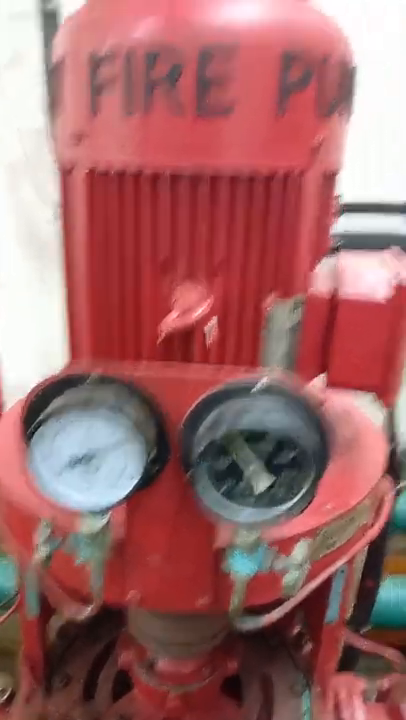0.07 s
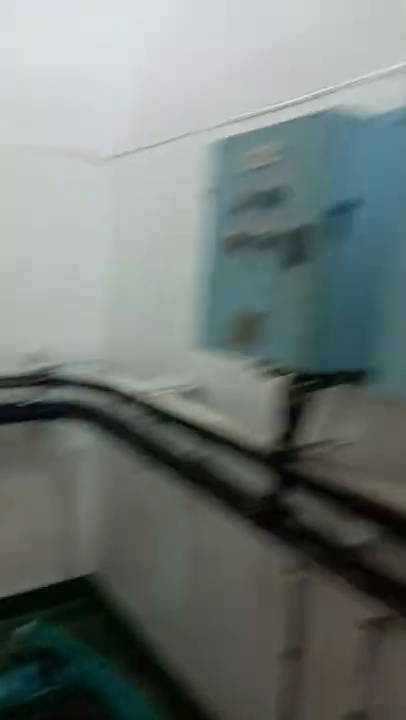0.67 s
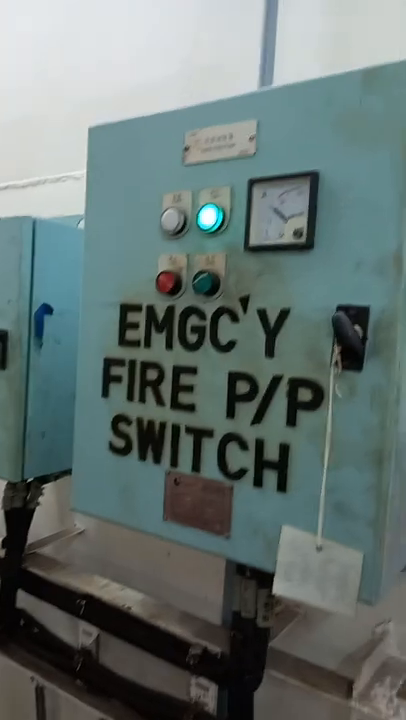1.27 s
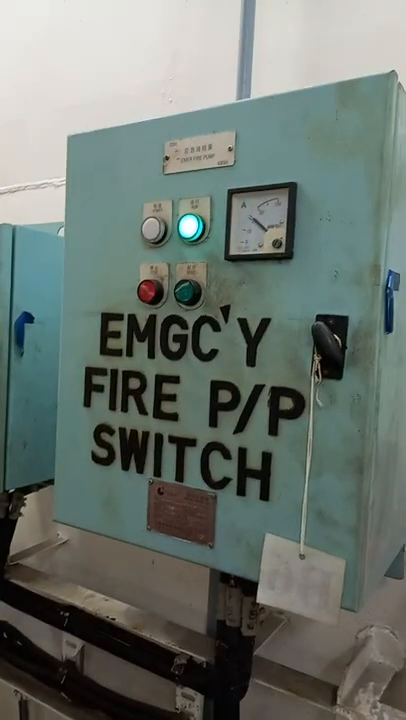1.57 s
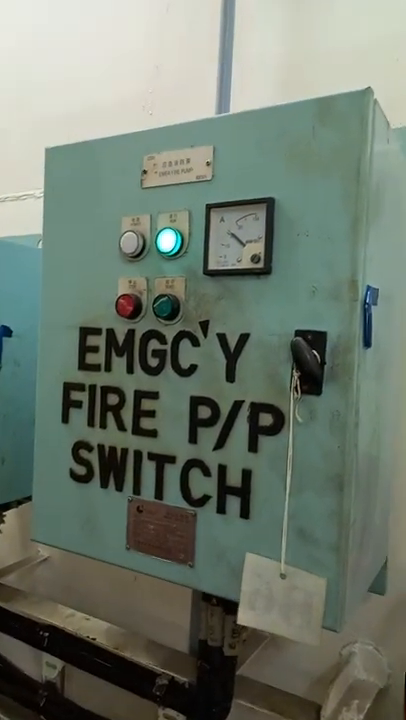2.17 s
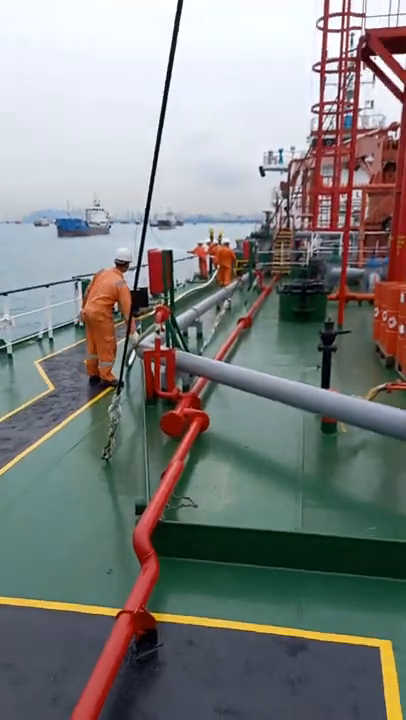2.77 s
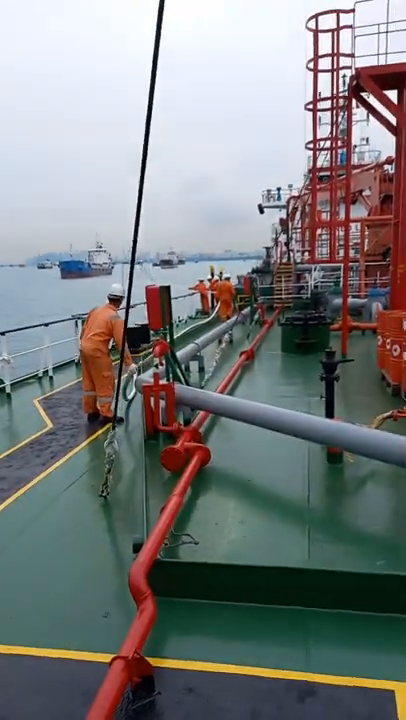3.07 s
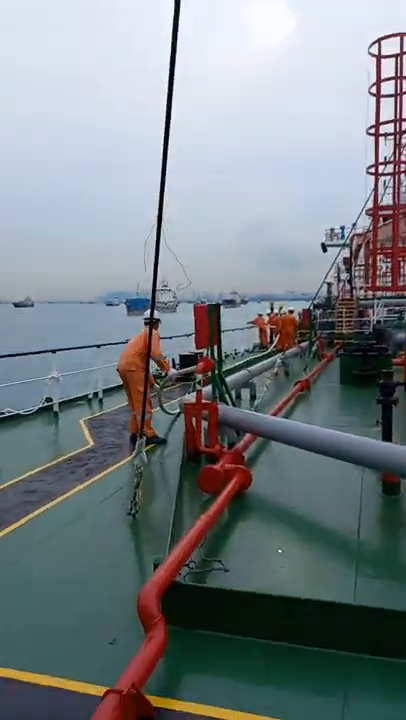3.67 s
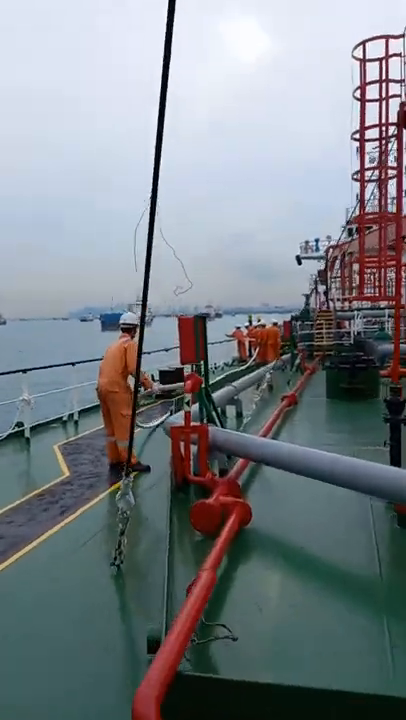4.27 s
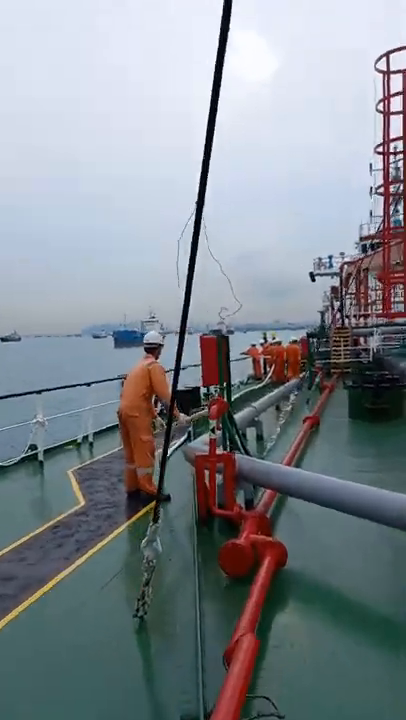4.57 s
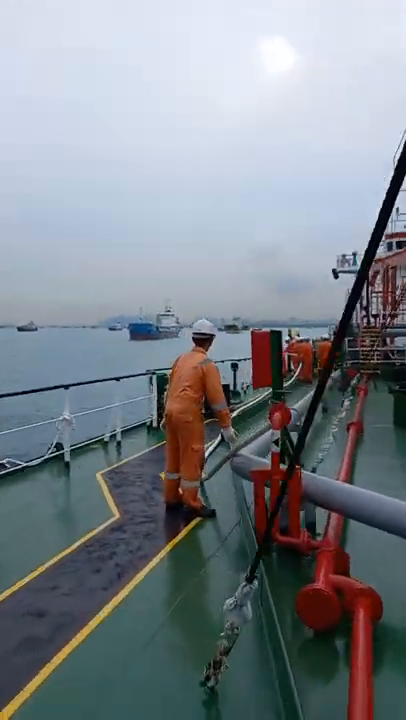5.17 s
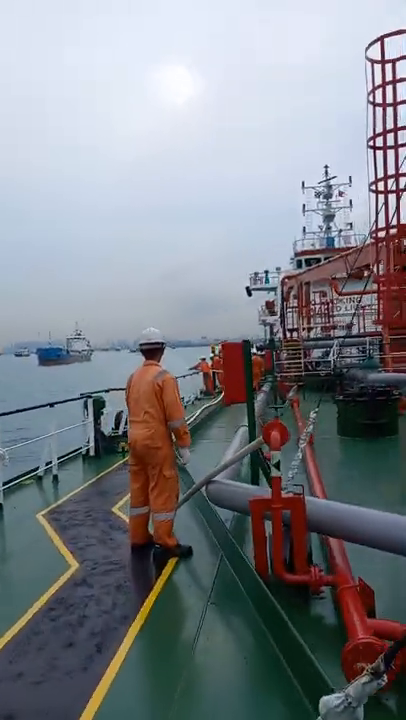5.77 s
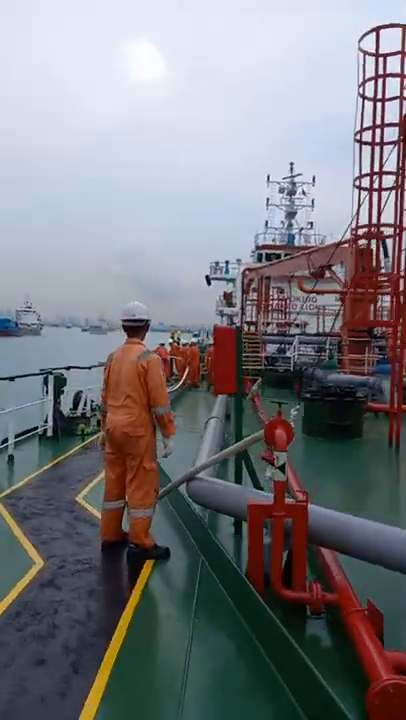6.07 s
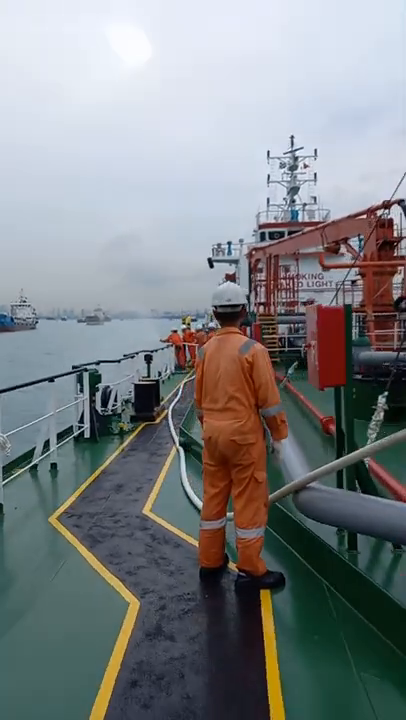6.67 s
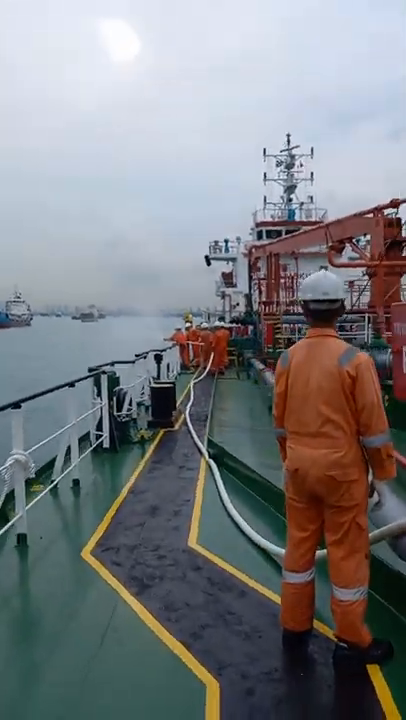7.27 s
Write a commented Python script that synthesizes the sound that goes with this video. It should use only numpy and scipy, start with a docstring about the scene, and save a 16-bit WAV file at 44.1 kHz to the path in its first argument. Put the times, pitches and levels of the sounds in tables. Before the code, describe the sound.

From the start, an electric pump runs loud and close in a ship's steel machinery room: a steady low hum with a whining motor and a rush of water and cooling air. The hum swells briefly around 1 second. At about 2.4 seconds the sound cuts abruptly to the quieter open deck. The pump is now muffled, its hum beating against a generator's low exhaust drone, with a soft roar of air ducts. A faint whine swells just after 3 seconds, and deck gear gives a dry click on the right at 3.4. Fainter ticks follow near 4.8, 5.3 and 6 seconds. From about 4 seconds the pump and ducts recede and wind rumbles on the microphone, thumping hardest between 5.5 and 6.6 seconds. The drones dip around 6.5, then return. A faint airy hiss swishes along until the end at about 7.6 seconds.

```python
"""An electric fire pump runs in a ship's steel machinery space: its shaft hums, its motor whines,
and rushing water and cooling air ring the casing. The scene then cuts to the open deck, where the
pump is muffled and falls behind, its hum beating against a generator's exhaust drone. Air ducts
roar softly, wind buffets the microphone, a faint hiss drifts by and deck gear ticks."""
import sys
import numpy as np
from scipy import signal
from scipy.fft import rfft, irfft, next_fast_len
from scipy.io import wavfile
from scipy.ndimage import uniform_filter1d

SR = 44100
rng = np.random.default_rng(int(sys.argv[2]) if len(sys.argv) > 2 else 0)


def generate_wav(sig):
    """Save sig (samples, or channels by samples) to the path in sys.argv[1] as 16-bit PCM at SR."""
    pcm = np.round(np.clip(np.atleast_2d(sig).T, -1, 1) * 32767).astype(np.int16)
    wavfile.write(sys.argv[1], SR, pcm)


N = 332073
TIME = np.arange(N) / SR
FREQS = np.maximum(np.fft.rfftfreq(N, 1 / SR), 1)

SHAFT_HZ, EXHAUST_HZ = 49.77, 75.42
DECK_S = 2.3502  # the cut from inside to the deck
OPEN_S, OPEN_LENGTH_S = 4.37, 0.61  # stepping out of the deckhouse's shelter

# how alike left and right are in the reverberant space: (frequency [Hz], correlation [0-1])
LIKENESS = [(60, .99), (130, 0.95), (290, 0.75), (640, 0.43), (1400, 0.11), (3000, 0)]


def undb(db):
    """Decibels to gain."""
    return 10 ** (np.asarray(db) / 20)


def pan(db):
    """Channel gains for left minus right in dB."""
    return undb(np.array([[db], [-db]]) / 2)


def bump(s, length):
    """A smooth rise and fall around a moment, 1 at its top."""
    return np.exp(-((TIME - s) / length) ** 2)


def ramp(s, length):
    """An even change from 0 to 1, centred on a moment."""
    return np.clip((TIME - s) / length + .5, 0, 1)


def swelling(steady_db, swells):
    """Gain of a steady bed plus swells (time [s], half-width [s], level [dB]), added in power."""
    swell_power = sum((undb(db) * bump(s, length)) ** 2 for s, length, db in swells)
    return np.sqrt(undb(steady_db) ** 2 + swell_power)


def drift(rate):
    """Random values held for 1 / rate seconds and smoothed twice; spread 1."""
    hold = int(SR / rate)
    held = np.repeat(rng.standard_normal(N // hold + 2), hold)
    smooth = uniform_filter1d(uniform_filter1d(held, hold), hold)[:N]
    return smooth / smooth.std()


def waver(depth_db, rate):
    """A gain that drifts up and down within bounds."""
    return undb(depth_db * np.tanh(drift(rate)))


def rotation(hz, wander):
    """Angle of a machine cycle whose speed wanders slightly."""
    return 2 * np.pi * np.cumsum(hz * (1 + wander * drift(5.94))) / SR


def colour(points):
    """A curve through (frequency [Hz], value) points, straight over log frequency."""
    hz, value = np.transpose(points)
    return np.interp(np.log(FREQS), np.log(hz), value)


def shape(x, db):
    """Equalise by a gain in dB at each frequency."""
    size = next_fast_len(N)
    gain = np.interp(np.fft.rfftfreq(size, 1 / SR), FREQS, undb(db))
    return irfft(rfft(x, size) * gain, size)[..., :N]


def treble_of(x):
    """The part of a sound above about 4 kHz."""
    return shape(x, -20 * np.log10(1 + (4000 / np.maximum(FREQS, 400)) ** 8))


def normalise(x, band_hz):
    """Scale a stereo sound so that its centre has unit RMS within a band."""
    sos = signal.butter(2, band_hz, "bandpass", fs=SR, output="sos")
    return x / np.std(signal.sosfilt(sos, x.mean(axis=0)))


def stereo_noise(likeness):
    """White noise whose two channels are correlated by the likeness."""
    likeness = np.broadcast_to(np.clip(likeness, 0, .999), FREQS.shape)
    mid = shape(rng.standard_normal(N), 10 * np.log10(1 + likeness))
    side = shape(rng.standard_normal(N), 10 * np.log10(1 - likeness))
    return np.array([mid + side, mid - side])


def flicker(x, rate, depth_db, bands):
    """Overlapping bands, closer in the bass, each swell and sink on their own."""
    place = np.sqrt(FREQS / FREQS[-1]) * (bands - 1)
    shares = (np.maximum(1 - abs(place - band), 1e-6) for band in range(bands))
    return sum(shape(x, 20 * np.log10(share)) * undb(depth_db * drift(rate)) for share in shares)


def distance_db(leaves_s=4.044, door_m=0.64, speed_m_s=1.46):
    """Spreading loss as the microphone lingers by the doorway, then walks away."""
    walked_m = speed_m_s * np.maximum(TIME - leaves_s, 0)
    return -20 * np.log10(1 + walked_m / door_m)


def lull_db():
    """Pump hum and generator drone dip briefly together."""
    # dips of the low drones: (time [s], half-width [s], depth [dB])
    lulls = [(6.49, 0.34, -13), (7.067, 0.037, -16)]
    return sum(db * bump(s, length) for s, length, db in lulls)


def surface_echo(air):
    """A surface comes close; its short, soft reflection combs the hiss with a shifting colour."""
    closeness = ramp(5.83, .5)
    lag_s = np.interp(closeness, (0, 1), (0.435e-3, 0.593e-3))
    gain = np.interp(closeness, (0, 1), (0.092, 0.58))
    soft = shape(air, colour([(3500, -6.5), (6000, -14), (11000, -14)]))
    return gain * np.array([np.interp(TIME - lag_s, TIME, side) for side in soft])


def hiss():
    """A faint airy hiss with a high sheen; it comes in swishes and turns fuller towards the end."""
    # tone of the hiss: (frequency [Hz], relative level [dB])
    hiss_spectrum = [(400, 7.5), (1000, -12), (1700, -6), (2500, -4.5), (3600, 3), (5200, 4), (7500, 5.5),
                     (8700, 0), (9800, -10), (15500, -24)]
    # tone of the sheen: (frequency [Hz], relative level [dB])
    sheen_spectrum = [(6000, -7), (9500, -4.5), (11500, -4), (13400, -2), (15500, -5.5)]
    # swells of both layers: (time [s], half-width [s], hiss level [dB], sheen level [dB])
    swishes = [(2.95, .35, -61, -70), (3.983, 0.078, -63, -57), (4.3, 0.41, -58, -70),
               (4.996, .08, -64, -64), (5.723, .1, -65, -56.5), (5.88, 0.25, -56, -62),
               (6.59, 0.086, -57, -55), (6.99, 0.19, -57.5, -58.5), (7.203, 0.14, -59, -57.5),
               (7.463, 0.11, -55, -68)]
    s, length, hiss_db, sheen_db = np.transpose(swishes)
    likeness = colour([(1500, 1.0), (5000, .1)])
    layers = (hiss_spectrum, -59.5, hiss_db), (sheen_spectrum, -61.5, sheen_db)
    air = 0
    for spectrum, steady_db, swish_db in layers:
        layer = normalise(shape(stereo_noise(likeness), colour(spectrum)), (3000, 15500))
        air = air + layer * swelling(steady_db, zip(s, length, swish_db))
    air = flicker(air, rate=12, depth_db=1.5, bands=24)
    body = shape(air, colour([(800, -16), (1500, 11.5), (2800, 1), (5000, -34), (9000, -27)]))
    air = air + body * undb(-5.5) * ramp(6.85, .2)
    air = air * undb(-3.5 * bump(6.3, 0.1))  # the hiss ducks briefly during the strongest gust
    return (air + surface_echo(air)) * pan(-2.4)


def ventilation(door_db=-38):
    """A low roar of air ducts that fades on the way along the deck."""
    # tone of the ducts: (frequency [Hz], relative level [dB])
    duct_spectrum = [(100, -23), (185, 4), (250, -6), (320, -1.5), (370, 0.5), (450, -2.5), (900, -16),
                     (3000, -53)]
    roar = shape(stereo_noise(0.99), colour(duct_spectrum))
    return roar / roar.std() * undb(door_db + 0.69 * distance_db())


def gear_ticks():
    """Small dry contacts of deck gear to the right that die at once in the open air."""
    # knocks of the gear: (time [s], peak before panning [dB])
    knocks = [(3.3845, -13.5), (4.757, -29), (5.322, -32), (6.049, -32)]
    # modes the gear rings with: (frequency [Hz], relative level [dB], time to fall 60 dB [s])
    modes = [(680, -7, .03), (950, 0, .014), (1250, -3, .018), (1950, -9, .024), (6100, -24, .015)]
    age = np.arange(SR // 10) / SR
    ring = sum(undb(db - 60 * age / t60) * np.sin(2 * np.pi * hz * age) for hz, db, t60 in modes)
    out = np.zeros((2, N))
    for s, peak_db in knocks:
        click = undb(-24) * rng.standard_normal(len(age)) * np.exp(-age / .004)
        tick = ring + click
        for side, lag_s in zip(out, (.0004, 0)):
            start = int((s + lag_s) * SR)
            side[start:start + len(age)] += undb(peak_db) * tick / abs(tick).max()
    return out * pan(-9)


def wind_gain(sheltered_db=-43, open_lift_db=8.5):
    """The breeze picks up outside the shelter, and gusts ride on it."""
    # gusts: (time [s], half-width [s], level [dB])
    gusts = [(3.41, 0.049, -28), (4.5, 0.12, -30), (5.098, 0.11, -32.5), (5.607, 0.32, -29.5),
             (6.008, 0.086, -25), (6.16, .075, -24), (6.563, 0.15, -38.5), (6.972, 0.068, -33.5)]
    return swelling(sheltered_db + open_lift_db * ramp(OPEN_S, OPEN_LENGTH_S), gusts)


def wind():
    """Turbulence rumbles at the two microphone ports in quick, uneven puffs."""
    # tone of the rumble: (frequency [Hz], relative level [dB])
    rumble_spectrum = [(25, -14), (45, -3.5), (70, 3.5), (120, 5), (170, -8), (260, -7), (400, -23),
                       (700, -33.5), (1500, -64), (4000, -73)]
    rumble = shape(stereo_noise(0.49), colour(rumble_spectrum))
    rumble = flicker(rumble, rate=40, depth_db=3.2, bands=12)
    puffs = np.array([waver(2.65, rate=45) for port in range(2)])
    return normalise(rumble * puffs, (115, 400)) * wind_gain()


def weak_eddies(count, over_wind_db=4.5, pitch_hz=180, spread_db=5):
    """Random extra buffets on deck, their strength following the wind."""
    peak_db = 20 * np.log10(wind_gain()) + over_wind_db
    eddies = []
    for s in rng.uniform(DECK_S, TIME[-1], count):
        hz = pitch_hz * 2 ** rng.uniform(-0.67, 0.22)
        eddies.append((s, np.interp(s, TIME, peak_db), hz, spread_db * rng.uniform(-1, 1)))
    return eddies


def buffets():
    """Each eddy is one quick push and pull of pressure, often at a single microphone port."""
    # the hardest hits: (time [s], level [dB], pitch [Hz], left minus right [dB])
    strong_eddies = [(4.422, -11, 98, -6), (5.49, -19.5, 222, -22), (5.949, -15.5, 186, 16),
                     (6.012, -11.5, 107, -5), (6.076, -12.5, 104, -2), (6.149, -15.5, 220, -18),
                     (6.200, -14.5, 148, -16), (6.215, -18, 240, -25.5), (6.319, -16, 122, 2),
                     (6.51, -14, 81, -2), (6.544, -21, 296, -8), (6.6, -27, 262, 0), (6.640, -15.5, 89, 0)]
    out = np.zeros((2, N))
    for s, db, hz, pan_db in strong_eddies + weak_eddies(count=16):
        near = abs(TIME - s) < .05
        cycles = (TIME[near] - s) * hz
        push = -np.sin(2 * np.pi * cycles + .5 * rng.standard_normal()) / np.cosh(cycles / 0.32)
        # a smaller whirl rides on the crest
        crest = np.exp(-(cycles / 0.34) ** 2)
        whirl = undb(-15) * crest * np.sin(2 * np.pi * (2.11 * cycles + rng.random()))
        out[:, near] += (push / abs(push).max() + whirl) * undb(db) * pan(pan_db)
    return out


def generator(sheltered_db=-26.5, open_lift_db=3.5):
    """Exhaust drone at the firing rate, with a weak octave and uneven firings."""
    # the walk crosses standing waves along the deck
    reflected, node_s, node_gap_s = 0.26, 3.93, 2.76
    standing = abs(1 - reflected * np.exp(2j * np.pi * (TIME - node_s) / node_gap_s))
    level_db = sheltered_db + open_lift_db * ramp(OPEN_S, OPEN_LENGTH_S) + lull_db()
    port_phase = np.array([[.06], [-.06]])
    angle = rotation(EXHAUST_HZ, wander=0.00295) + port_phase
    drone = np.sin(angle) + undb(-15) * waver(3.3, rate=4) * np.sin(2 * angle)
    return np.sqrt(2) * drone * standing * undb(level_db) * waver(1.7, rate=24)


def motor_whine(angle):
    """On deck the microphone passes through spots where the motor's 31st harmonic adds up."""
    # swells of the whine: (time [s], level [dB], half-width [s])
    swells = [(3.15, -43, 0.073), (4.41, -51, 0.04)]
    gain = sum(undb(db) * bump(s, length) for s, db, length in swells)
    return gain * np.sqrt(2) * np.sin(31 * angle + .4 * drift(25))


def pump_rush():
    """Turbulent water and fan air ring the casing; the flow seethes."""
    # tone of the water and cooling air: (frequency [Hz], relative level [dB])
    flow_spectrum = [(30, -24), (48, -5.5), (68, -5), (130, 1.5), (250, -2.5), (330, -5.5), (620, -5.5),
                     (950, -11), (1320, -11.5), (2000, -12), (3800, -23), (7300, -28.5), (10000, -33.5),
                     (15500, -40.5)]
    # resonances of the casing and motor: (frequency [Hz], width [Hz], lift [dB])
    resonances = [(736, 102, 5.5), (802.6, 41, 8), (1122, 84, 5), (1187, 48, 10.5), (1528, 38, 8),
                  (6220, 1020, 9), (12280, 1550, 16.5)]
    lift_db = sum(db / (1 + (2 * (FREQS - hz) / width) ** 2) for hz, width, db in resonances)
    rush = shape(stereo_noise(colour(LIKENESS)), colour(flow_spectrum) + lift_db)
    return normalise(flicker(rush, rate=30, depth_db=0.86, bands=14), (300, 3000))


def pump_harmonics(angle):
    """Shaft harmonics; standing waves shift their level and phase, widening the higher ones."""
    # tones beside the main hum: (pitch [x shaft rate], level [dB], waver depth [dB])
    harmonics = [(1, -43, 3), (3, -31, -1), (4, -33.5, -0.5), (5, -32, -2), (6, -32.5, 2.5), (8, -49, 7),
                 (12, -40.5, -5), (16, -42, 6), (24, -43, 4), (28, -38, 3.5), (29, -44, -3.5),
                 (31, -45.5, -1), (131.2, -50.5, 6.5)]
    out = np.zeros((2, N))
    for order, db, waver_db in harmonics:
        order = round(2 * order) / 2
        width = 1 - np.interp(order * SHAFT_HZ, FREQS, colour(LIKENESS))
        phase = order * angle + 0.099 * drift(9)
        gain = undb(db) * waver(waver_db, rate=10)
        for side in out:
            side += gain * waver(3 * width, rate=6.06) * np.sin(phase + 0.42 * width * drift(3.23))
    return out


def pump_hum(angle):
    """The pump's main hum, at twice the shaft rate."""
    return np.sqrt(2) * np.sin(2 * angle)


def distant_pump(rush, harmonics, hum):
    """Through the doorway the rush fades and dulls with distance; the hum carries in the deck plates."""
    # colour of the way out to the deck: (frequency [Hz], relative gain [dB])
    doorway = [(50, 15.5), (150, 11), (300, 4.5), (600, -3.5), (950, 2), (1190, -1), (1550, 2),
               (2000, -1.5), (3200, -4.5), (6500, -0.5), (10000, 2), (12300, -7), (15500, -7)]
    far_db = distance_db()
    rush_db = -40 + far_db
    dull_db = -5 + .65 * far_db
    hum_db = -23.5 + 0.45 * far_db + lull_db()
    airborne = shape(rush + undb(23.5 + .5 * far_db) * harmonics, colour(doorway))
    dulled = airborne + treble_of(airborne) * (undb(dull_db) - 1)
    return normalise(dulled, (700, 2000)) * undb(rush_db) * pan(-1.3) + hum * undb(hum_db)


def close_pump(rush, harmonics, hum):
    """Beside the pump; the microphone turns away, losing some rush and a little more treble."""
    turned = ramp(.9, 0.38)
    body_db = -24.5 - 1.52 * turned
    treble_db = -38.5 - 2 * turned
    hum_db = -20.5 + 4.2 * bump(0.96, 0.15)  # crossing a spot where the hum piles up
    treble = treble_of(rush)
    body = (rush - treble) * undb(body_db) * pan(-0.99)
    top = normalise(treble, (5000, 14000)) * undb(treble_db) * pan(-2.6)
    return body + top + harmonics + hum * undb(hum_db) * pan(0.79)


def scene():
    """The machinery space first, then a hard cut to the deck."""
    angle = rotation(SHAFT_HZ, wander=0.000635)
    pump = pump_rush(), pump_harmonics(angle), pump_hum(angle)
    machines = distant_pump(*pump) + motor_whine(angle) + generator() + ventilation()
    deck = machines + wind() + buffets() + hiss() + gear_ticks()
    return np.where(TIME < DECK_S, close_pump(*pump), deck)


def record(dry, low_hz=30, top_hz=15650):
    """The microphone rolls off the deepest bass and cuts the top steeply."""
    low_cut = signal.butter(2, low_hz, "highpass", fs=SR, output="sos")
    high_cut = signal.ellip(10, .1, 80, top_hz, fs=SR, output="sos")
    return signal.sosfilt(high_cut, signal.sosfilt(low_cut, dry))


dry = scene()
out = record(dry)
generate_wav(out)
```